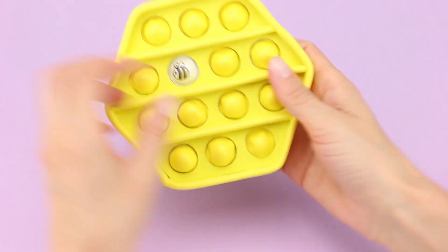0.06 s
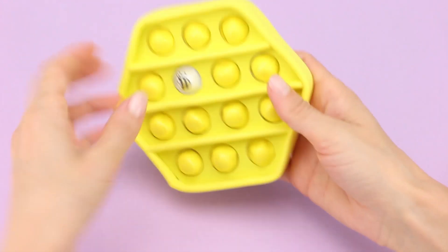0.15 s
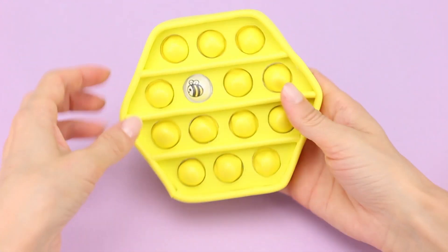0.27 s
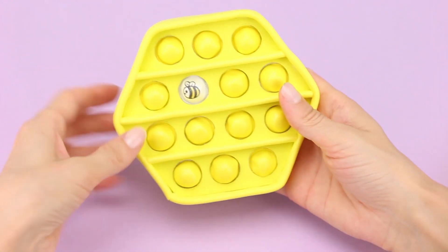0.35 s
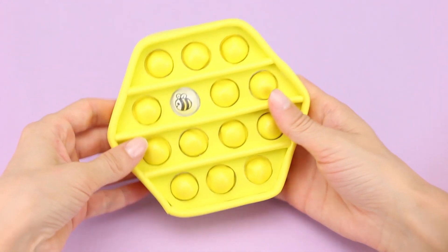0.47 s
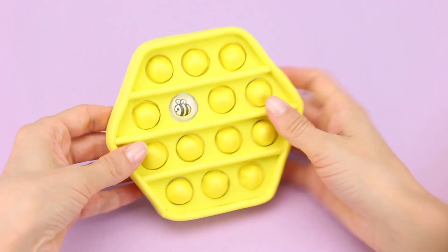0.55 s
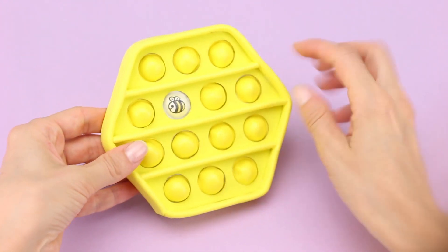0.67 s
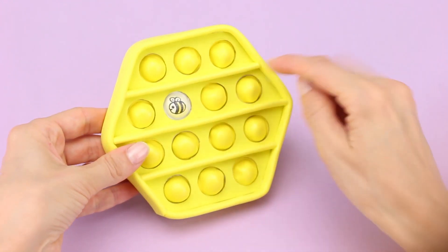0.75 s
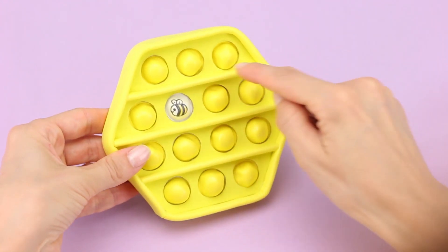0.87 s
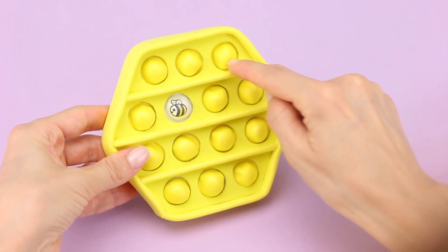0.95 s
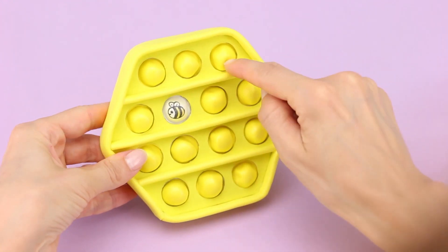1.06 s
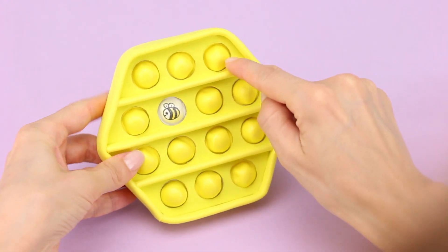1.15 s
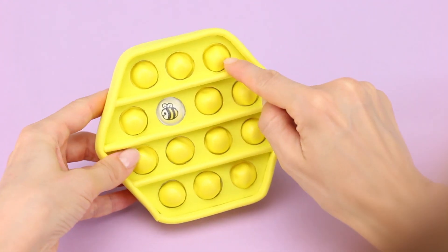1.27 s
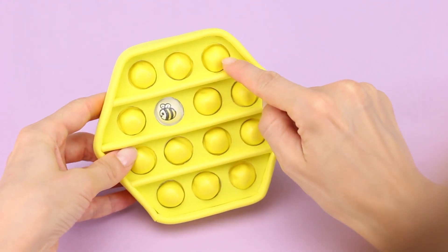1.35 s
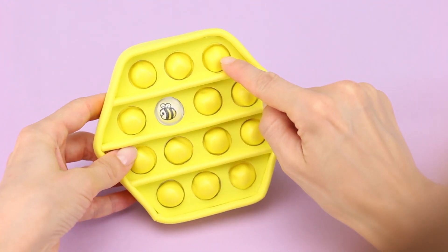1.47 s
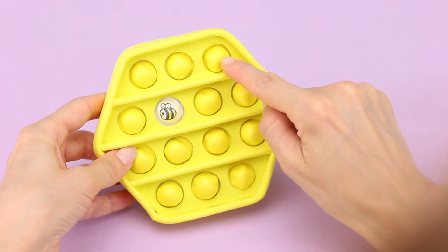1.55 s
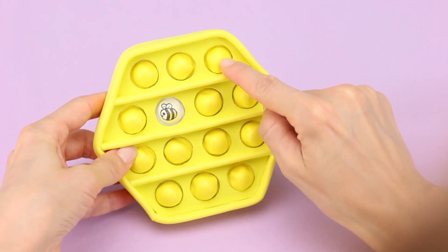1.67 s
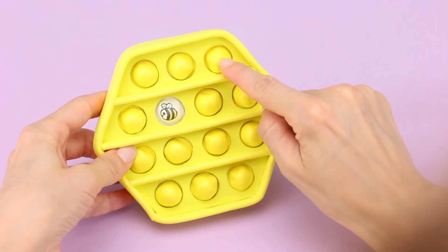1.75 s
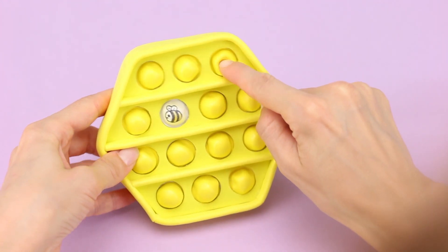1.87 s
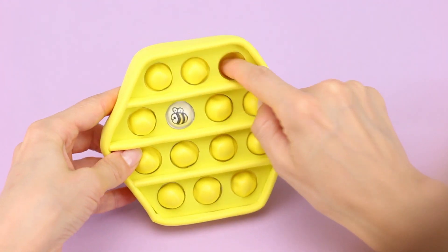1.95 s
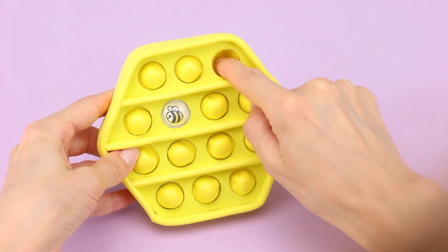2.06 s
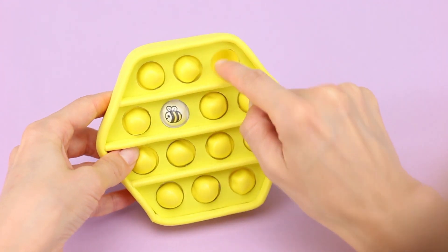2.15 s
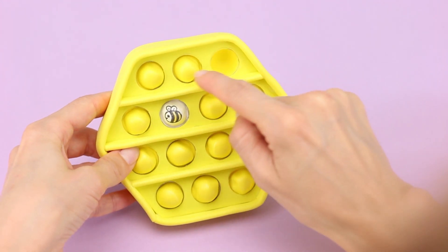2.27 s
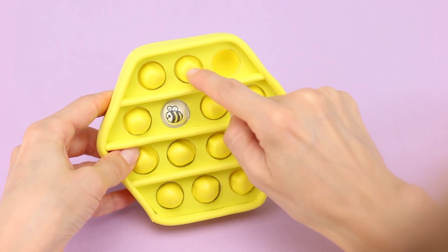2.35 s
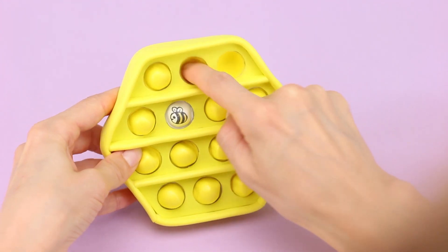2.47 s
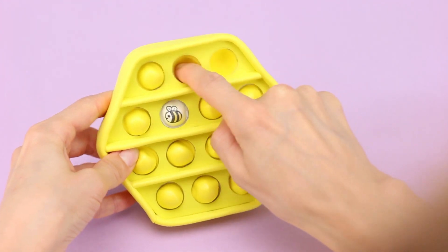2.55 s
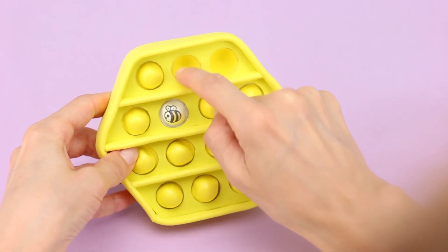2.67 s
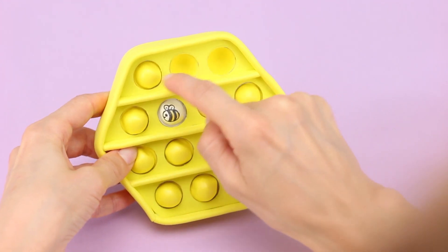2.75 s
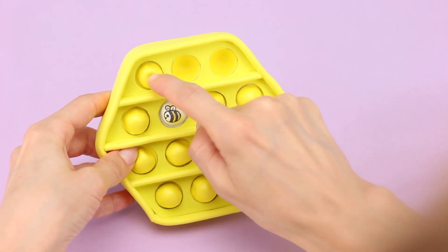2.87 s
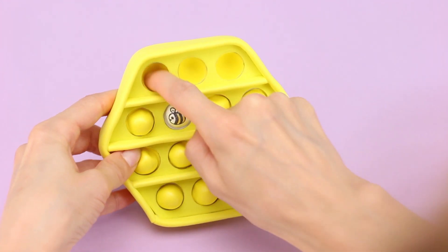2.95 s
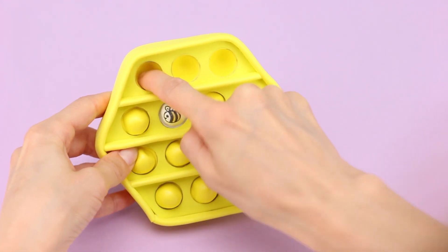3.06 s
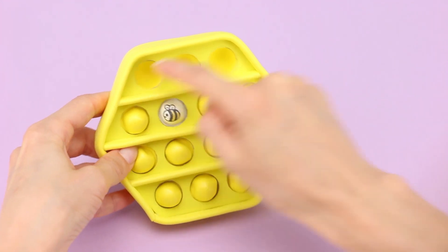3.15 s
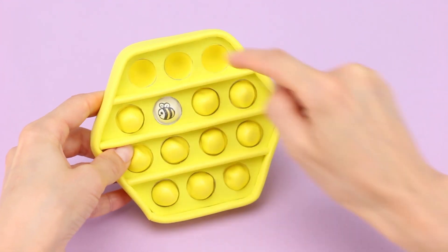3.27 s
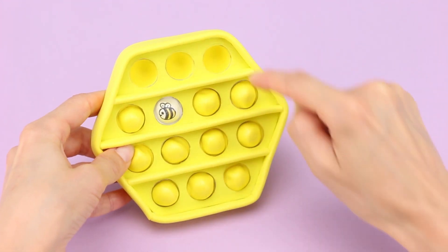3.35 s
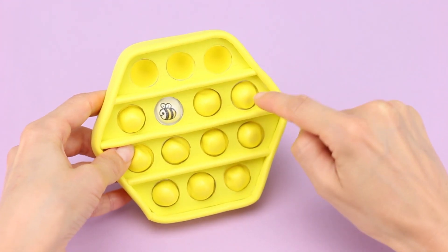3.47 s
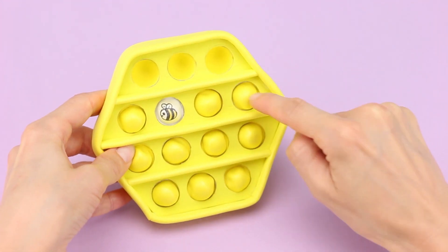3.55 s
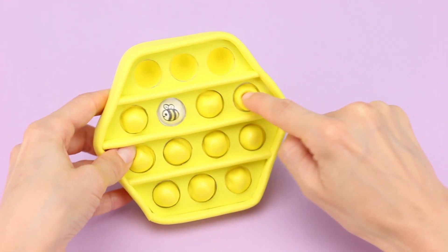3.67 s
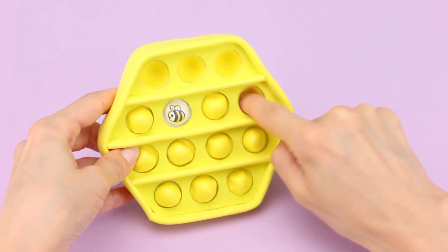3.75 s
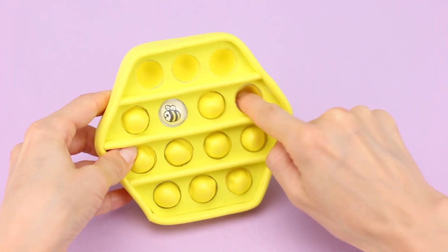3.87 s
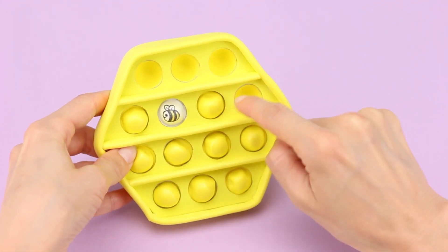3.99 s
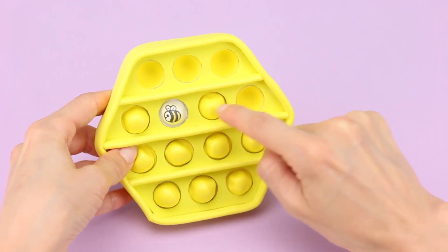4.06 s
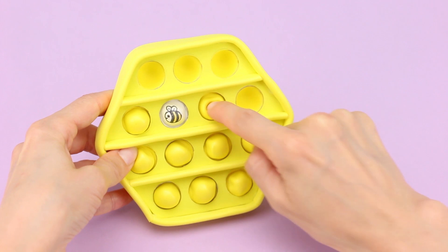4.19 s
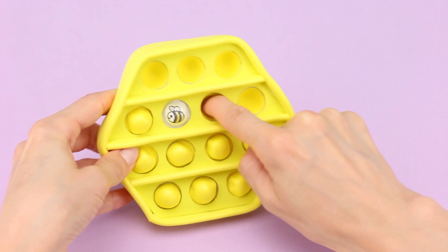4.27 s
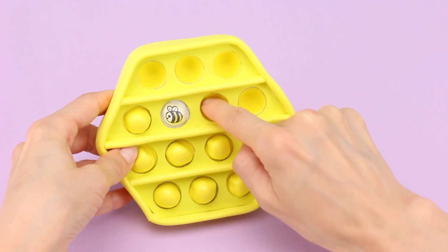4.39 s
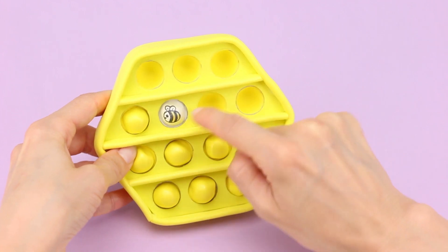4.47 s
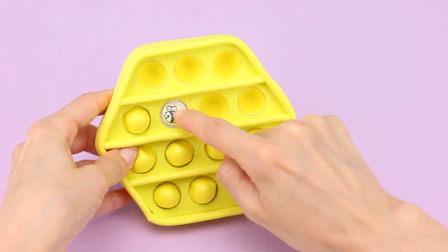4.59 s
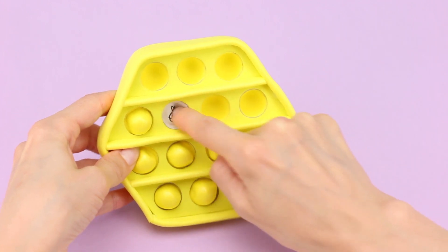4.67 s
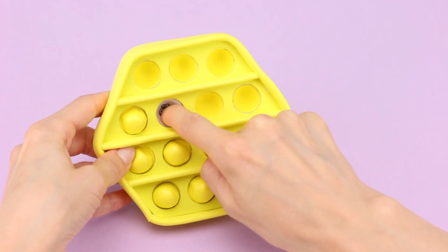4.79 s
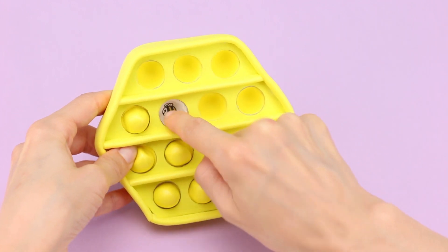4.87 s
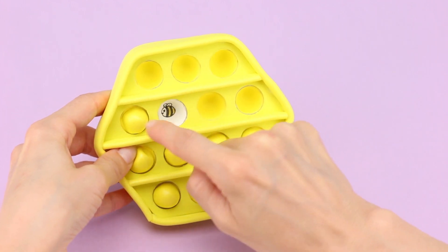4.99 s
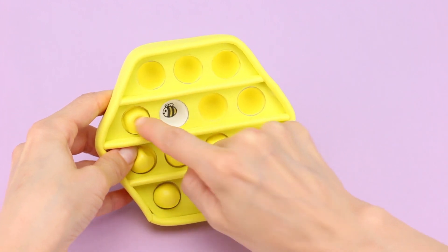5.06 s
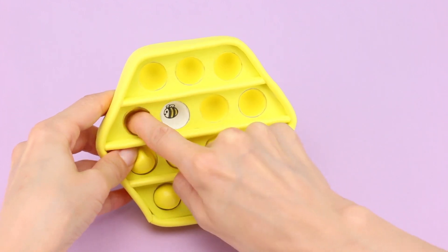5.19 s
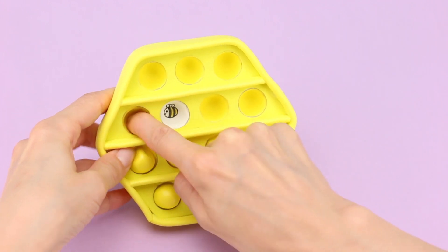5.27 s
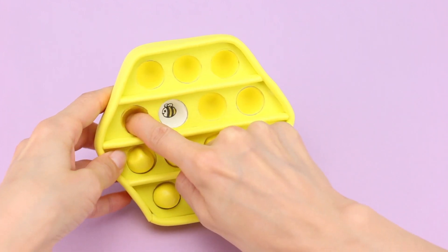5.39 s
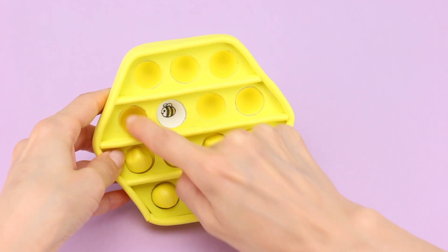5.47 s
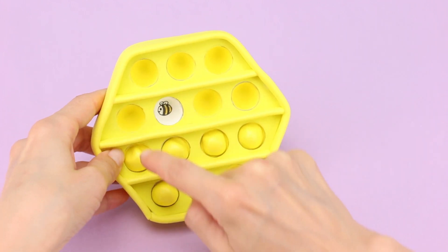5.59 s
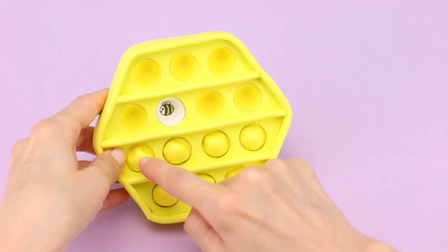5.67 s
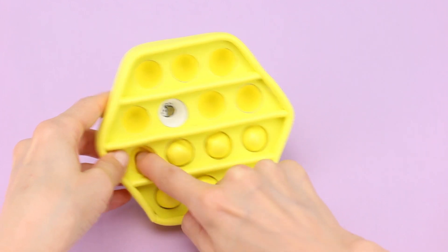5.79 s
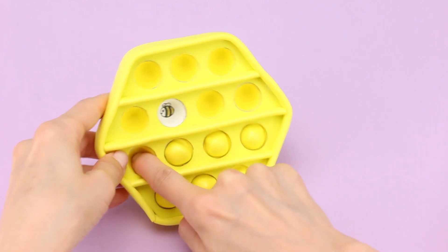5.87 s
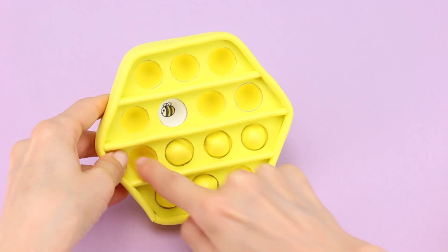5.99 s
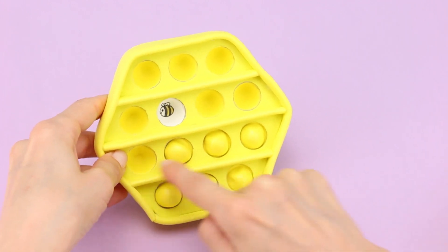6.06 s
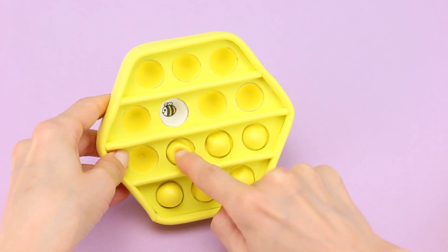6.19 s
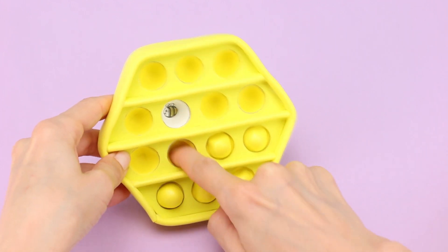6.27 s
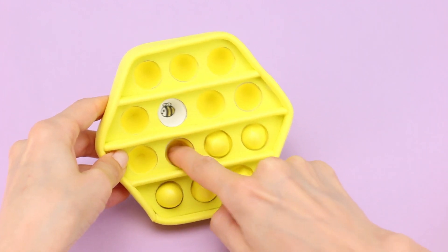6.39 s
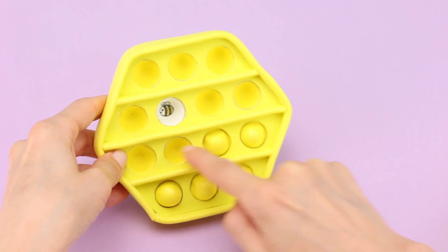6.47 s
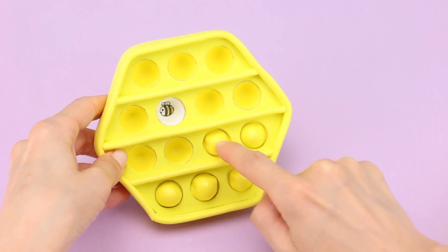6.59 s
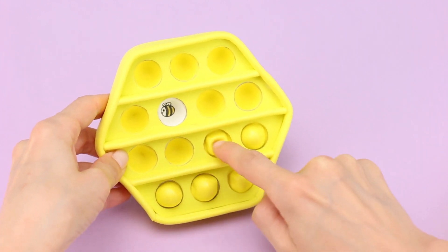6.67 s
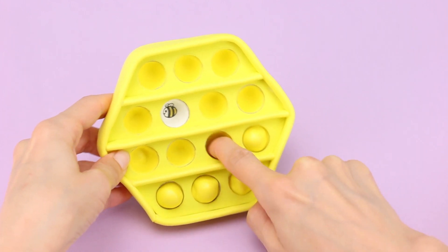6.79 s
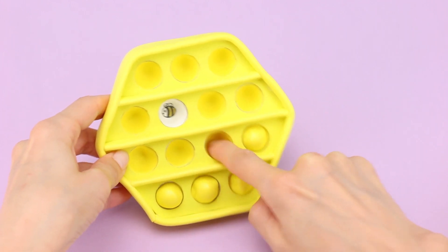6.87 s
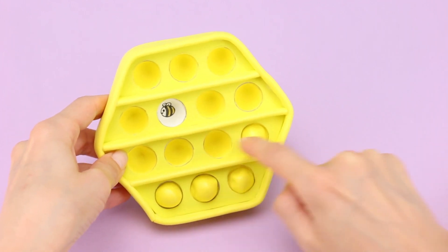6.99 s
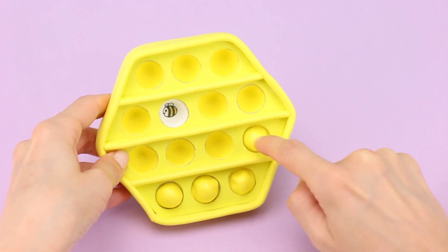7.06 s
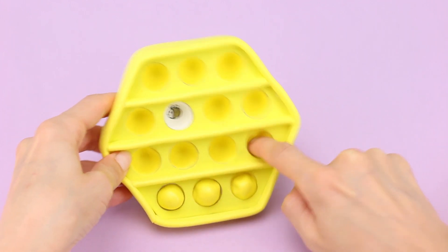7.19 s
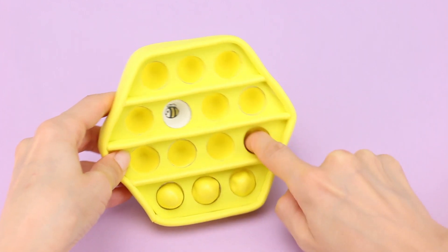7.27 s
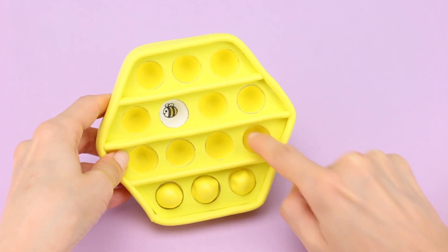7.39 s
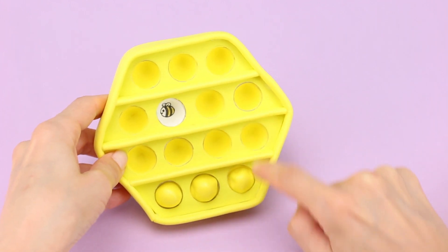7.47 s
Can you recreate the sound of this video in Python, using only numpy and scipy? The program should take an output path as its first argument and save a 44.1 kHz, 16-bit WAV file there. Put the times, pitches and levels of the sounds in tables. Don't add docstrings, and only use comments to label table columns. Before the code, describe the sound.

Fingers rub and tap a rubbery silicone bubble toy, then press its domes one by one with short, hollow, loud pops, close up.

```python
import sys
import numpy as np
from scipy import signal
from scipy.fft import rfft, irfft, next_fast_len
from scipy.io import wavfile
from scipy.ndimage import map_coordinates

SR = 44100
rng = np.random.default_rng(int(sys.argv[2]) if len(sys.argv) > 2 else 0)


def nominal_scale(level):
    x = np.asarray(level, float) / 20
    return 10 ** x


def store_wav(level_fs):
    pcm = np.round(np.clip(np.atleast_2d(level_fs), -1, 1) * 32767)
    wavfile.write(sys.argv[1], SR, pcm.T.astype(np.int16))


N = 332073

# (time [s], level [dB], close crack [dB], close air push [dB], dome name)
POPS = [(2.0334, 2, -16.5, -57, "a"), (2.5401, -6, -15, -47, "b"), (2.544, 3.5, -7, -32.5, "b"),
        (3.0246, -13.5, -27, -41, "c"), (3.0318, -1.5, -19.5, -34, "c"), (3.8099, -27.5, -6, -24, "f"),
        (3.8346, -8.5, -9, -17.5, "d"), (4.3343, 1.5, -25, -24, "e"), (4.7481, -29.5, -25, -20, "f"),
        (4.7764, -24, -22, -34, "f"), (4.782, -20.5, -14, -44, "f"), (4.7859, -24, -26, -40, "f"),
        (4.7917, -42.5, -12, -34, "f"), (5.2246, 3, -42, -22, "g"), (5.892, -5, -33, -38.5, "h"),
        (6.35, 1.5, -30, -16.5, "i"), (6.8309, 5, -14, -55, "j"), (7.295, 2, -11, -52, "k")]
# (frequency [Hz], level [dB])
CRACK_COLOUR = [(1500, -24.5), (4000, -3.5), (6000, 9), (10000, -21), (15500, -30), (16500, -35.5)]
# (frequency [Hz], level [dB per Hz])
RUB_COLOUR = [(700, -9), (1500, -12.5), (2400, -2.5), (3500, -5), (5500, -12), (8000, -26)]
CRACK_S, CRUNCH_S = 0.0002, 0.0029
BULGE_DB = -12.5


def domes():
    ringing, close = np.zeros((2, N + SR))
    creak = noise(RUB_COLOUR)[0]
    lead = np.arange(-900, 0) / SR
    around = np.arange(-400, 400) / SR
    bulge = 8 * np.gradient(signal.windows.hann(48) ** 2)
    for s, db, crack_db, push_db, dome in POPS:
        at = round(s * SR)
        reluctant = dome == "f"
        ringing[at - 900:at] += nominal_scale(db - 56) * np.exp(lead / 0.01) * creak[at - 900:at]
        close[at - 24:at + 24] += nominal_scale(db + BULGE_DB) * bulge
        close[at:at + 90] += nominal_scale(db + push_db) * signal.windows.hann(90)
        spread = CRUNCH_S if reluctant else CRACK_S
        grit = rng.standard_normal(len(around)) * np.exp(-abs(around) / spread)
        grit /= np.linalg.norm(grit)
        crack = np.convolve(grit, snap(CRACK_COLOUR)[:400])
        push = grit if reluctant else around == 0
        pop = np.convolve(push, snap(colour(dome)))
        ringing[at - 400:][:len(pop)] += nominal_scale(db + 3) * pop
        close[at - 400:][:len(crack)] += nominal_scale(db + crack_db) * crack
    return ringing[:N], close[:N]


# (frequency [Hz], level [dB per Hz])
SHELL = [(65, -39), (137, -24.5), (650, -9.5), (1000, -6.5), (2200, -17), (4500, -25.5), (9000, -43.5),
         (13000, -66)]
CUPS = {"a": (1298, -5.5, 2580, -0.5, -6), "b": (1253, -2.5, 1943, -0.5, 3),
        "c": (1152, -7, 2095.5, -5, 0.5), "e": (1251.5, 0, 1746, 1, 2.5), "g": (1383, -1, 2543, -10, -6),
        "h": (1348, -1, 3500, -21, -4.5), "i": (1277, 1.5, 1735, 2, -0.5), "j": (1489, 4, 2914, -4.5, -9),
        "k": (1456, 2, 2856, -10.5, -4)}
RIMS = {"a": (4698.5, -14.5, 7, 4.5, 8.5), "b": (3302, -6.5, 5.5, 2, 8.5), "c": (4295.5, -15, 7.5, 7, 2),
        "e": (2989, -7.5, -1, 9, -16), "g": (4299, -17.5, -9.5, -1, -3), "h": (4300, -19, -10.5, 5, 10.5),
        "i": (3900, -15.5, -1.5, 3, 0.5), "j": (6500, -19.5, 3.5, -1.5, 12), "k": (4693, -20, 7.5, 0, -1)}
ODD_DOMES = {"d": [(65, -37.5), (170, -3.5), (240, 2), (320, -13.5), (950, 1), (1900, -11), (5000, -28.5),
             (13000, -58)], "f": [(65, -31), (160, -16), (400, -3.5), (800, -20.5), (1350, -14.5),
             (1900, -15), (9000, -27.5), (15600, -41)]}
CUP_Q, OVERTONE_Q, RIM_Q = 1.28, 1.32, 1.87
DIP_PLACES, DIP_OCTAVES = (0.738, 1.32), 0.12


def colour(dome):
    if dome in ODD_DOMES:
        return ODD_DOMES[dome]
    cup_hz, cup_db, over_hz, over_db, dip_db = CUPS[dome]
    rim_hz, rim_db, thud_db, belly_db, bright_db = RIMS[dome]
    hz = np.geomspace(40, 20000, 200)
    grip = [(140, thud_db), (330, belly_db - 4), (1100, 0.031), (7000, bright_db)]
    power = nominal_scale(along(SHELL, hz) + along(grip, hz)) ** 2
    resonances = [(cup_hz, cup_db, CUP_Q), (over_hz, over_db, OVERTONE_Q), (rim_hz, rim_db, RIM_Q)]
    for centre, db, q in resonances:
        detune = q * (hz / centre - centre / hz)
        power += nominal_scale(2 * db) / (1 + detune ** 2) ** 4
    dips_db = 0
    for place in DIP_PLACES:
        octaves = np.log2(hz / over_hz / place)
        dips_db = dips_db + dip_db * np.exp(-(octaves / DIP_OCTAVES) ** 2)
    return np.transpose([hz, 10 * np.log10(power) + dips_db])


def snap(spectrum, size=4096):
    hz = np.fft.rfftfreq(size, 1 / SR)
    cepstrum = irfft(np.log(nominal_scale(np.maximum(along(spectrum, hz), -90))))
    cepstrum[1:size // 2] *= 2
    cepstrum[size // 2 + 1:] = 0
    pulse = -irfft(np.exp(rfft(cepstrum)))[:size // 2]
    return pulse / np.abs(pulse).max()


# (time [s], peak level [dB], thump [dB], ring [Hz], contact [ms])
TAPS = [(0.064, -42, -38, 965, 1.7), (0.174, -41, 1.5, 1490, 1.8), (0.476, -46, -15, 1447, 4.6),
        (0.518, -45.5, -6, 1560, 1.9), (0.609, -44.5, -10, 2230, 4), (0.666, -38, -6, 1990, 6.5),
        (1.008, -44.5, -6.5, 2640, 2.8), (1.075, -53, -14, 2040, 1.5), (1.435, -48, -22, 3270, 4),
        (1.689, -47, -14, 2350, 2.3), (1.971, -49, -10, 4500, 1.9), (1.99, -47.5, -12, 2580, 1.84),
        (2.932, -54, -27.5, 2060, 3.8), (3.684, -54, -3, 2390, 3.3), (4.214, -44, -5, 2260, 3.8),
        (5.15, -54, -5, 2500, 3), (5.805, -41.5, -30, 1520, 2.6), (6.253, -47, -15, 1573, 3.3),
        (6.716, -42, -11, 2200, 1)]


def taps():
    out, t = np.zeros(N + SR), np.arange(2048) / SR
    low, high = np.sin(2 * np.pi * 155 * t), np.sin(2 * np.pi * 410 * t)
    thump = np.exp(-t / 0.0072) * (low + 0.84 * high)
    for s, db, thump_db, ring_hz, ms in TAPS:
        scuff = rng.standard_normal(len(t)) * np.exp(-1000 * t / ms)
        ring = np.exp(-t / 0.001) * np.sin(2 * np.pi * ring_hz * t)
        click = signal.fftconvolve(scuff, ring)[:len(t)]
        click /= np.abs(click).max()
        out[round(s * SR):][:len(t)] += nominal_scale(db) * (click - nominal_scale(thump_db - 3.5) * thump)
    return out[:N]


# (peak time [s], level [dB], swell [s], fade [s], hiss over rub [dB])
SLIDES = [(0.09, -44.5, 0.93, 0.035, -13), (0.52, -52, 0.13, 0.082, -14), (0.61, -49.5, 0.033, 0.09, -7),
          (0.69, -51, 0.14, 0.18, -3.5), (1.2, -50.5, 0.037, 0.18, -10), (1.44, -49.5, .02, 0.062, -36),
          (1.7, -60, 0.097, 0.32, -20), (2.432, -43.5, .09, 0.093, -9), (3.313, -49, 0.15, 0.078, -29),
          (3.686, -57, .04, .025, -18.5), (4.792, -50, 0.084, 0.023, -6), (4.946, -53, 0.013, 0.058, -3.5),
          (5.544, -46, 0.069, 0.041, -9), (6.08, -43, 0.024, 0.0083, -8.5)]
# (time [s], level [dB], fade [s], body over rub [dB])
LANDINGS = [
    (0.172, -50.5, 0.081, -6),
    (0.52, -60, 0.046, -18),
    (1.01, -59, .3, -3),
    (2.941, -61, .06, 4),
    (4.21, -52, 0.055, 2.5),
    (4.946, -67.5, 0.055, 5),
    (5.149, -54.5, .08, -1),
    (5.81, -70, 0.079, 8),
    (6.712, -66, .06, -1),
]
# (time [s], level [dB], swell [s])
STRAINS = [
    (2.012, -48, 0.045),
    (2.518, -64.5, 0.14),
    (3.003, -69, 0.069),
    (3.802, -48, 0.04),
    (4.31, -69, 0.037),
    (5.2, -73, 0.074),
    (5.87, -58, .1),
    (6.329, -52, 0.075),
    (6.811, -54.5, .06),
    (7.277, -46, .025),
]
# (peak time [s], level [dB], swell [s], fade [s])
SINGS = [
    (0.01, -41.5, 0.12, 0.12),
    (0.48, -56, .02, 0.13),
    (0.67, -51, 0.052, 0.12),
    (2.4, -54, .08, 0.058),
    (3.25, -52, .05, 0.11),
    (4.792, -43.5, 0.06, .05),
    (4.946, -52, .02, 0.042),
    (5.499, -67.5, 0.037, 0.085),
]
# (time [s], level [dB], length [s])
PEELS = [
    (3.209, -59, 0.014),
    (3.988, -59, 0.022),
    (4.482, -55, 0.025),
    (6.065, -63, 0.028),
    (6.511, -53.5, 0.023),
    (7.005, -42.5, 0.012),
]
# (frequency [Hz], level [dB per Hz])
HOLLOW_COLOUR = [(900, -18.5), (1230, -8.5), (1330, 0), (1450, 3), (1800, -16.5)]
# (frequency [Hz], level [dB per Hz])
HISS_COLOUR = [(3000, -14), (6000, -4), (9000, -6), (15000, -21)]
# (frequency [Hz], level [dB per Hz])
BODY_COLOUR = [(60, -16), (140, 4), (300, 2), (700, -12.5)]
LAND_S, GIVE_S = 0.015, 0.0035
SLIDE_BODY_DB, LAND_HISS_DB, LAND_RING_DB = -16.5, -9.5, -13
STRAIN_RING_DB, STRAIN_HISS_DB, STRAIN_BODY_DB = -7, -8, -6


def skin():
    t = np.arange(N) / SR
    s, db, swell, fade, hiss_db = np.transpose(SLIDES)
    slide = swells(s, db, swell, fade)
    slide_hiss = swells(s, db + hiss_db, swell, fade)
    s, db, fade, body_db = np.transpose(LANDINGS)
    land = swells(s, db, LAND_S, fade)
    land_body = swells(s, db + body_db, LAND_S, fade)
    strain = swells(*np.transpose(STRAINS), GIVE_S)

    rub = slide + land + strain
    hollow = swells(*np.transpose(SINGS)) + nominal_scale(LAND_RING_DB) * land + nominal_scale(STRAIN_RING_DB) * strain
    hiss = slide_hiss + nominal_scale(LAND_HISS_DB) * land + nominal_scale(STRAIN_HISS_DB) * strain
    body = nominal_scale(SLIDE_BODY_DB) * slide + land_body + nominal_scale(STRAIN_BODY_DB) * strain
    for s, db, length in PEELS:
        hiss += nominal_scale(db) * np.exp(-((t - s) / length) ** 2)

    steps = rng.standard_normal(N // 200 + 4)
    grain = unit(nominal_scale(2 * map_coordinates(steps, [np.arange(N) / 200])))
    grainy = rub * noise(RUB_COLOUR)[0] + hollow * noise(HOLLOW_COLOUR)[0] + hiss * noise(HISS_COLOUR)[0]
    return grain * grainy + body * noise(BODY_COLOUR)[0]


# (delay [s], level [dB])
WALLS = [(.0008, -31), (.0016, -32.5), (.0024, -23.5), (.0032, -16.5), (.0067, -22), (.01, -43.5),
         (0.0127, -19), (0.0185, -24.5), (0.0234, -25), (0.029, -21.5), (0.035, -33), (.0383, -46),
         (.0587, -24.5), (0.089, -22), (0.092, -23)]
# (frequency [Hz], time to fall 60 dB [s])
ROOM_T60 = [(100, 0.16), (260, 0.74), (700, 0.29), (1500, 0.55), (3000, 0.49), (5500, 0.51), (9000, .4),
            (12500, 0.098)]
# (frequency [Hz], level [dB])
EARLY = [(100, -0.5), (300, -2.5), (800, 12), (1500, -33), (4000, -18.5), (12000, -10)]
# (frequency [Hz], likeness [-1 to 1])
ROOM_ALIKE = [(100, 1), (300, 1), (700, 0.92), (1400, 0.77), (3100, 0.7), (7000, 0.24), (15000, 0.068)]
# (frequency [Hz], level [dB], time to fall 60 dB [s])
ROOM_MODES = [(145.4, -31.5, 0.43), (239.6, -27.5, 0.17)]


def room(x):
    hz, frames, z = signal.stft(rng.standard_normal((2, SR * 3 // 4)), SR, nperseg=128)
    late = nominal_scale(-60 * frames / along(ROOM_T60, hz)[:, None])
    early = nominal_scale(along(EARLY, hz)[:, None] - 60 * frames / 0.084)
    decay = late + early
    decay /= np.linalg.norm(decay[:, 8:], axis=1, keepdims=True)
    tail = signal.istft(z * decay, SR, nperseg=128)[1]
    t = np.arange(tail.shape[1]) / SR
    tail *= 1 - np.exp(-t / 0.004)
    answer = alike(tail, ROOM_ALIKE)
    answer *= nominal_scale(-1.5) / np.linalg.norm(answer, axis=1, keepdims=True)
    soft = signal.windows.hann(5)[1:-1] / 2
    sides = rng.uniform(-3, 3, len(WALLS))
    for (delay, db), side_db in zip(WALLS, sides):
        levels = nominal_scale(db + side_db * np.array([[1], [-1]]))
        answer[:, round(delay * SR):][:, :3] += levels * soft
    for f, db, t60 in ROOM_MODES:
        answer += nominal_scale(db - 22.5 - 60 * t / t60) * np.sin(2 * np.pi * f * t)
    return signal.fftconvolve(x[None], answer, axes=1)[:, :N]


# (peak time [s], level [dB])
JOLTS = [(0.7, -73), (1.25, -88), (2.08, -73.5), (2.6, -81.5), (3.1, -65.5), (3.9, -71.5), (4.4, -66),
         (4.82, -77), (5.28, -73), (5.95, -66), (6.42, -67), (6.9, -63), (7.362, -62)]
# (frequency [Hz], level [dB per Hz])
TABLE_COLOUR = [(36, -14.5), (46, -3.5), (58, -22)]
# (frequency [Hz], level [dB per Hz])
FLOOR_COLOUR = [(15, -46), (25, -18), (80, -1), (240, -0.5), (450, -2), (1000, -5.5), (1550, -7.5),
                (2400, -9.5), (3700, -11), (8800, -19), (14400, -25), (15600, -30), (16200, -41)]
# (frequency [Hz], likeness [-1 to 1])
FLOOR_ALIKE = [(60, -0.66), (240, -0.67), (950, -0.66), (3770, -0.46), (15000, 0.055)]
FLOOR_DB, RUMBLE_DB = -60.5, -88.5
JOLT_SWELL_S, JOLT_FADE_S = 0.062, 0.3


def floor():
    shake = nominal_scale(RUMBLE_DB) + swells(*np.transpose(JOLTS), JOLT_SWELL_S, JOLT_FADE_S)
    rumble = shake * noise(TABLE_COLOUR)
    hiss = unit(alike(noise(FLOOR_COLOUR, channels=2), FLOOR_ALIKE))
    return nominal_scale(FLOOR_DB + 4.5) * hiss + rumble


def unit(x):
    return x / np.sqrt(np.mean(x ** 2) + 1e-20)


def along(points, hz):
    f, v = np.transpose(points)
    return np.interp(np.log(hz + 1), np.log(f + 1), v)


def filtered(x, response):
    n = x.shape[-1]
    m = next_fast_len(n + SR // 4)
    return irfft(rfft(x, m) * response(np.fft.rfftfreq(m, 1 / SR)), m)[..., :n]


def alike(pair, likeness):
    def mid_side(hz):
        turn = np.arccos(np.clip(along(likeness, hz), -1, 1)) / 2
        return np.array([np.cos(turn), np.sin(turn)])

    mid, side = filtered(pair, mid_side)
    return np.array([mid + side, mid - side])


def noise(spectrum, channels=1):
    closed = [(spectrum[0][0] / 2, -90)] + list(spectrum) + [(spectrum[-1][0] * 2, -90)]
    return unit(filtered(rng.standard_normal((channels, N)), lambda hz: nominal_scale(along(closed, hz))))


def swells(s, db, swell_s, fade_s):
    t, out = np.arange(N) / SR, np.zeros(N)
    for at, top_db, up, down in np.broadcast(s, db, swell_s, fade_s):
        near = slice(max(round((at - 3 * up) * SR), 0), round((at + 3 * down) * SR))
        late = t[near] - at
        out[near] += nominal_scale(top_db - 20 * np.maximum(-late / up, late / down))
    return out


# (frequency [Hz], level [dB])
FACING = [(300, -1), (1500, -2), (6000, -3), (10000, -0.5)]
LEFT_LEADS_S = 6e-6
HAND_DB, HAND_ROOM_DB = -6.5, -7.0


def scene():
    def direct(hz):
        lead = np.exp(1j * np.pi * LEFT_LEADS_S * np.outer([1, -1], hz))
        return nominal_scale(along(FACING, hz)) * lead

    pops, close = domes()
    hand = skin()
    toy = pops + taps()
    answer = room(toy + nominal_scale(HAND_ROOM_DB) * hand)
    return filtered(toy + close, direct) + nominal_scale(HAND_DB) * hand + answer + floor()


def low_pass(x):
    return signal.sosfilt(signal.butter(12, 17010, fs=SR, output="sos"), x)


# (frequency [Hz], left over right [dB])
LEFT = [(50, 2.5), (300, -0.5), (1300, 2), (4000, 2), (14000, 1)]
# (frequency [Hz], level [dB])
TOP = [(15600, 1.5), (16300, -11), (17500, -27)]
CLIP_HARDNESS = 11


def record(dry):
    tilted = filtered(dry, lambda hz: nominal_scale(np.outer([0.5, -0.5], along(LEFT, hz))))
    clipped = tilted / (1 + abs(tilted) ** CLIP_HARDNESS) ** (1 / CLIP_HARDNESS)
    finished = filtered(clipped, lambda hz: nominal_scale(along(TOP, hz)))
    return low_pass(finished)


dry = scene()
out = record(dry)
store_wav(out)
```